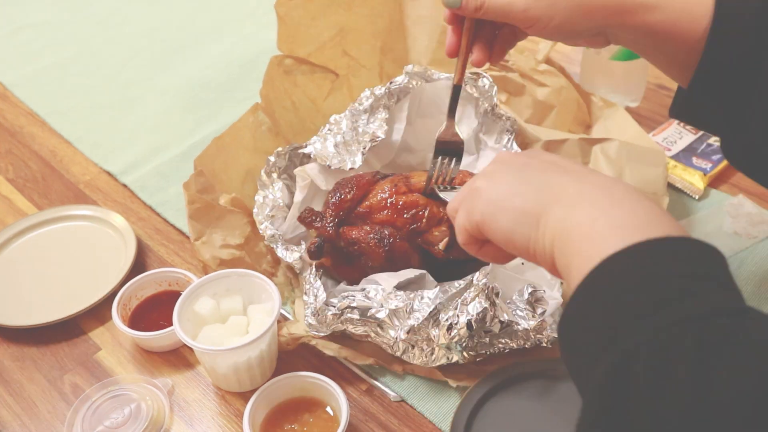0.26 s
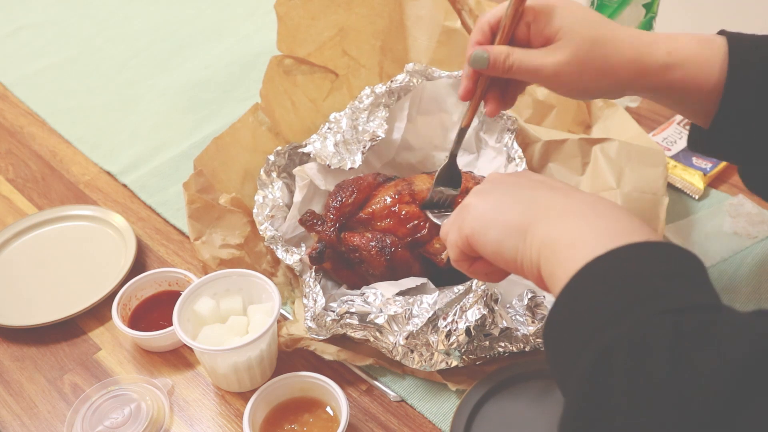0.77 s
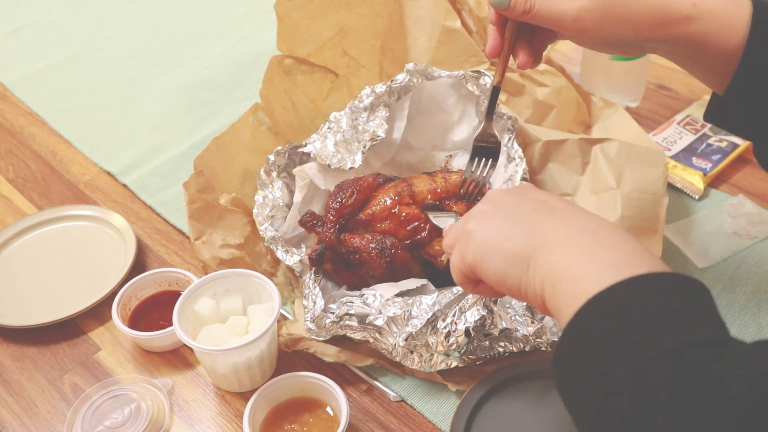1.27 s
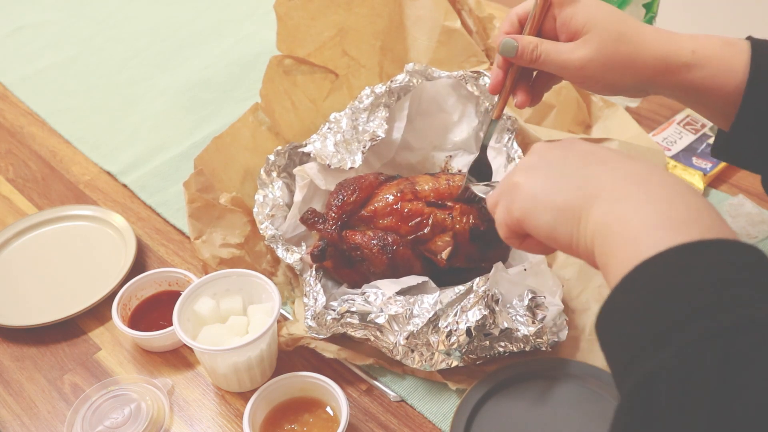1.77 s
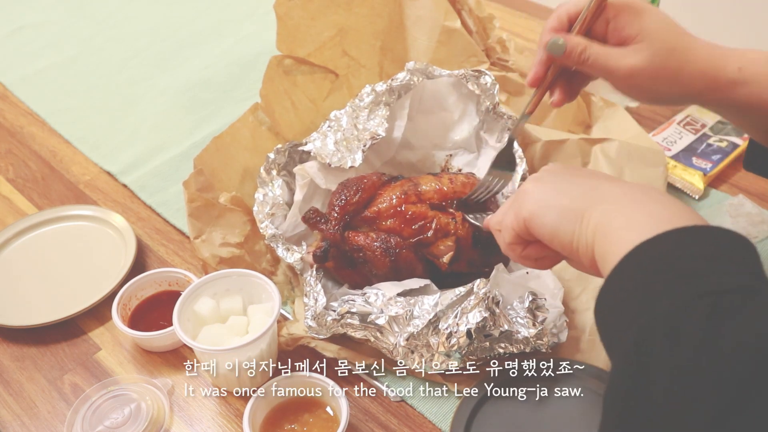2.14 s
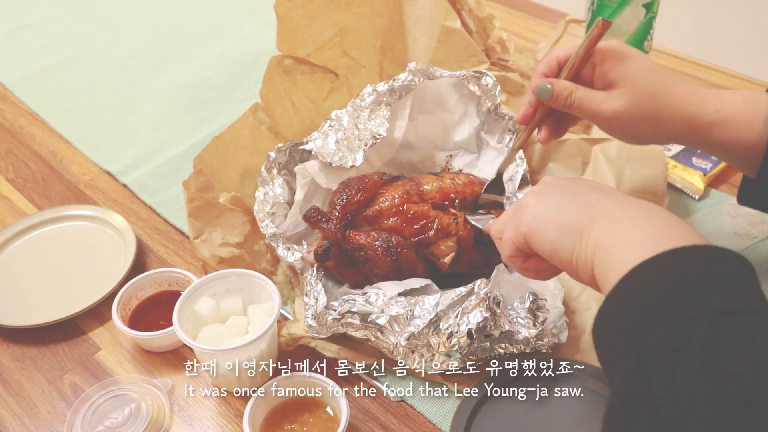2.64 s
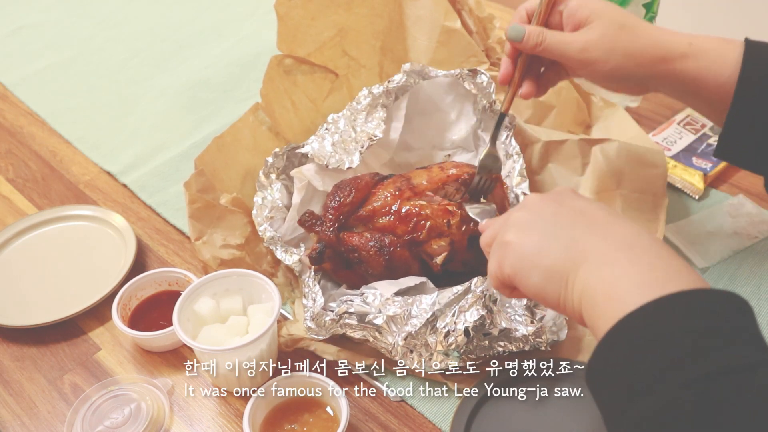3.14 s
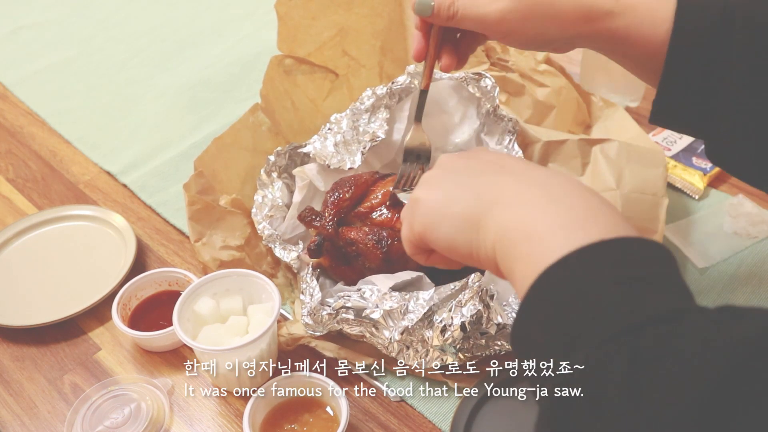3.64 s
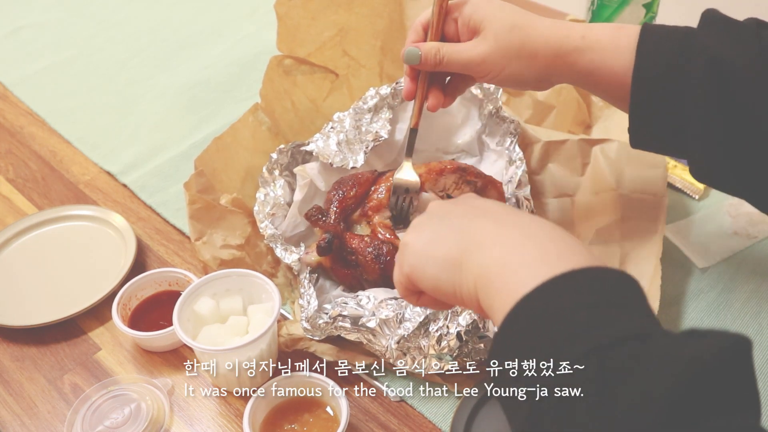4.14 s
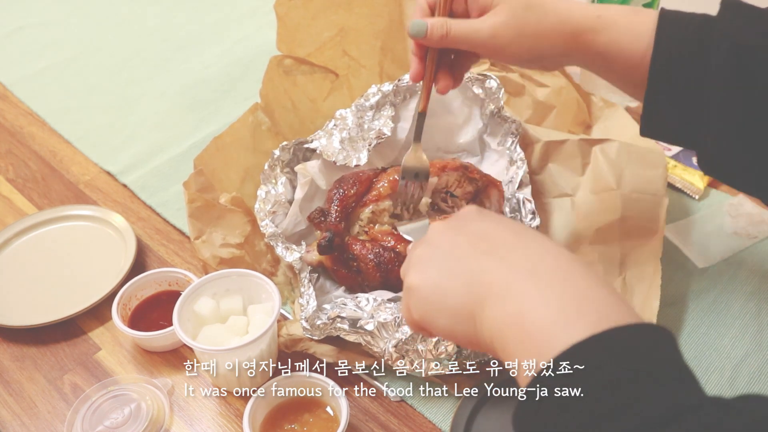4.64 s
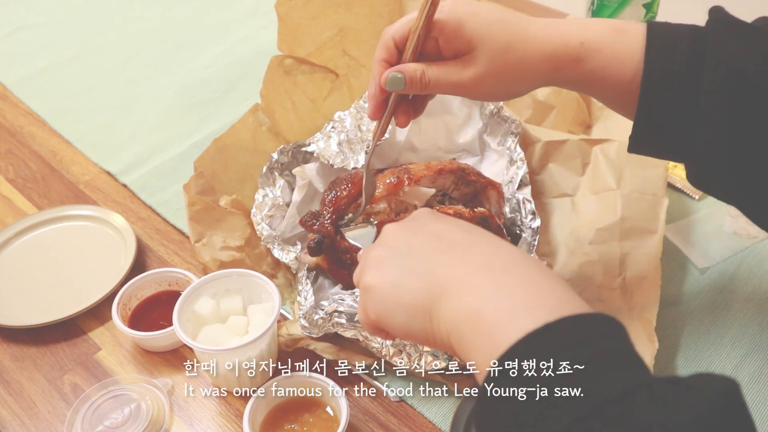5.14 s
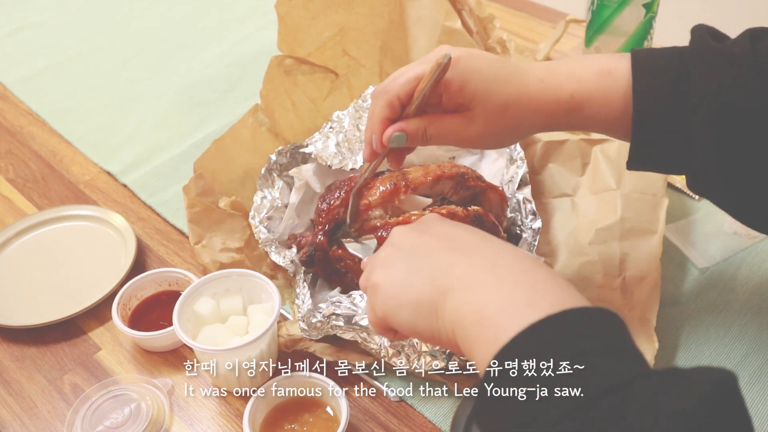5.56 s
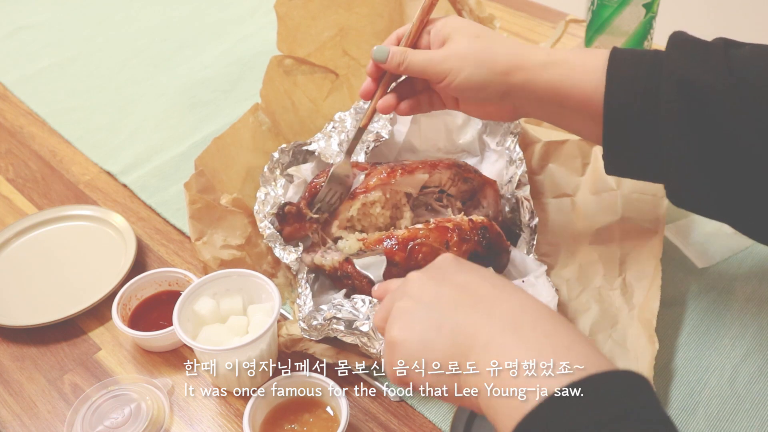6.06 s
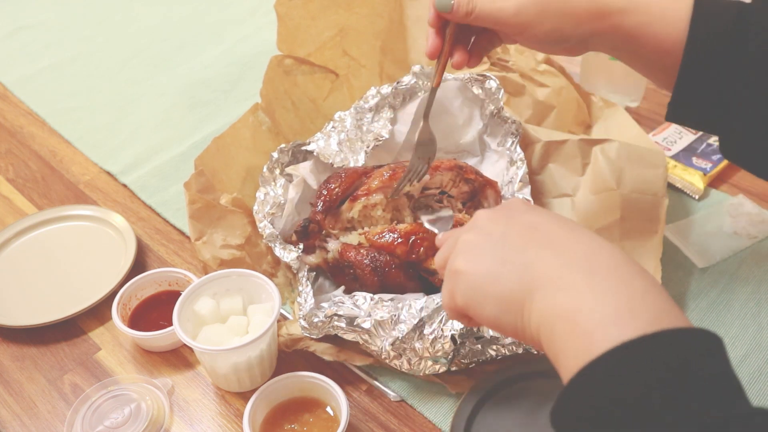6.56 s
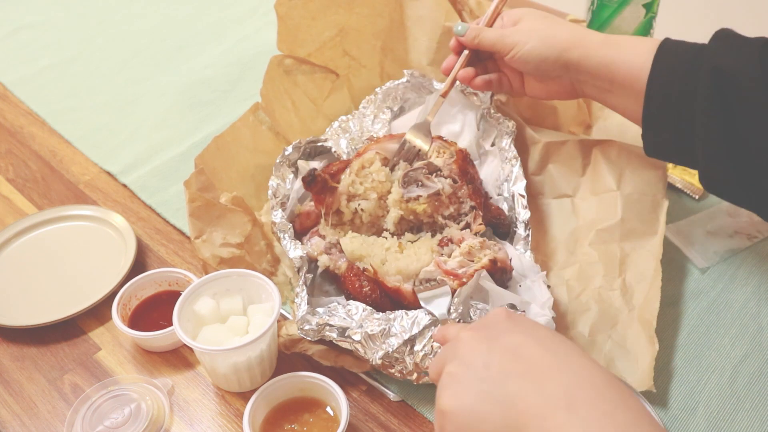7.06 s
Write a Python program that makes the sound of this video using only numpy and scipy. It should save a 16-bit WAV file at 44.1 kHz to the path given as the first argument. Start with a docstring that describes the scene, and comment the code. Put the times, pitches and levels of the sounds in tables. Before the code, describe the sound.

Close microphone in a small quiet room. Two forks tear a roast chicken in a nest of foil on paper. Sharp foil snaps over fine crackle come in irregular bursts, with faint fork clinks near one second, dull bumps and rumbles as the parcel shifts, tiny wet ticks of parting meat, brief scrapes, and a final dragging rustle of foil.

```python
"""In a small room, two forks pull a roast chicken apart in its nest of foil on wrapping paper, close by.
Creases snap one by one, each a short noise burst ringing its own facet, over a fine crackle of tiny clicks.
Soft slips make the pushed parcel rumble, and short dull bursts make it bump on the table.
Meat parts with tiny ticks, the nest drags, forks scrape, and fading sine tones let a fork ring faintly."""
import sys
import numpy as np
from scipy import signal
from scipy.fft import rfft, irfft
from scipy.io import wavfile
from scipy.ndimage import uniform_filter1d

SR = 44100
rng = np.random.default_rng(int(sys.argv[2]) if len(sys.argv) > 2 else 0)


def generate_wav(signal):
    """Clip the signal to [-1, 1] and save it as 16-bit WAV at the path in sys.argv[1]."""
    frames = np.transpose(np.atleast_2d(signal))
    scaled = np.clip(frames, -1, 1) * 32767
    pcm = np.round(scaled).astype(np.int16)
    wavfile.write(sys.argv[1], SR, pcm)


N = 322371
TIME = np.arange(N) / SR
CONTROL_TIME = np.arange(0, N / SR + .001, .001)  # slow controls are worked out every millisecond

# Colour of the quiet room air. Each row: frequency in Hz, level in dB.
AIR = [(25, -2.5), (180, 13), (400, 9), (780, 5), (1300, -17), (4000, -34), (5500, -13), (9000, -9.5),
       (15500, -18)]
AIR_DB = -50.5

# The forks lean on the bird and shift the parcel. Each row: start of full strength in seconds,
# rumble level in dB before its trim, swell in seconds, hold in seconds, deep rumble in dB against the rest.
PUSHES = [(.005, -39, .02, 0.0043, -7), (.12, -45, 0.053, .01, -13), (.64, -47, 0.43, 0.51, -1.5),
          (1.5, -35, 0.56, 0.24, -0.5), (2.01, -32, 0.54, 0.0041, 2), (2.55, -32.5, 0.59, 0.043, -0.5),
          (2.75, -28.5, .1, 0.013, 2), (2.86, -34.5, 0.14, 0.097, -3.5), (3.33, -41, 0.087, 0.022, -3),
          (3.94, -40.5, 0.082, 0.079, -4), (4.2, -36.5, 0.58, .17, -4), (4.71, -36, 0.37, 0.056, -2),
          (5, -37.5, 0.14, 0.04, 3), (5.43, -33, 1, 0.0072, -2.5), (5.7, -31, 0.25, 0.013, -6.5),
          (5.9, -37, 0.29, 0.02, -3), (6.15, -67, .05, 0.12, -3), (6.81, -37, 0.19, 0.082, -3),
          (7.17, -47, 0.29, 0.1, 2)]
REST_DB, USUAL_PUSH_DB = -59, -51  # parcel settling between pushes, and usual pressure; before the rumble's trim
# Colour of the rumble. Each row: frequency in Hz, level in dB.
RUMBLE_COLOUR = [(25, -18), (55, -3.5), (85, -2.5), (125, 1.5), (190, 0), (260, 1.5), (370, -2.5),
                 (600, -4.5), (1000, -9), (2000, -24)]
# The parcel bumps on the table. Each row: start in seconds, average level in dB before the bumps' trim,
# middle of its broad pitch in Hz, length in milliseconds.
BUMPS = [(1.377, -34, 248, 8.3), (1.51, -29.5, 353, 26), (2.002, -29, 198, 14), (2.469, -35, 300, 8),
         (2.751, -20, 340, 4.3), (2.804, -30, 200, 14), (2.882, -23, 486, 5.1), (2.938, -25, 485, 13),
         (2.985, -20, 264, 3.3), (4.205, -24.5, 198, 6.3), (4.25, -23.5, 450, 5.3), (5.662, -24, 517, 5.7),
         (5.698, -23, 536, 12.5), (6.146, -37, 344, 25), (7.17, -22.5, 620, 5.9)]

# A fork's tines are plucked. Each row: start in seconds, level in dB before the forks' trim, main pitch in Hz.
CLINKS = [(0.872, -30, 4700), (.917, -24.5, 4823), (1.051, -35, 4680), (1.21, -29, 4870),
          (5.006, -26, 5523), (5.018, -30, 7600)]
# Ways the tines ring. Each row: multiple of the main pitch, level in dB, time to fall by 60 dB in seconds.
TINES = [(.792, -38, .25), (0.999, -5, 0.26), (1.039, -19, .17), (1.1, -10, 0.29), (1.22, -24, .25),
         (1.53, -10, .2), (1.755, -20, 0.38), (2.05, -26, .2)]
# One fork rubs the other or bone. Each row: start of full strength in seconds, level in dB,
# swell in seconds, hold in seconds.
SCRAPES = [(3.755, -43.5, 0.043, 0.1), (3.95, -24.5, 0.046, .005), (5.21, -38, 0.028, .06)]
# Resonances of a tightly held fork. Each row: pitch in Hz, width setting in Hz, drive in dB.
FORK_BODY = [(2847, 120, 9), (3950, 240, -14), (4630, 850, 9), (5000, 430, -9)]

# Sticky skin and meat fibres part. Each row: start in seconds, average level in dB before the skin's trim.
SKIN_TICKS = [(0.533, -30), (0.5422, -25), (0.6998, -29), (0.8644, -21), (1.3508, -29), (1.4377, -20),
              (1.4641, -15), (1.7574, -21.5), (1.8614, -20), (2.2707, -19.5), (2.542, -16.5), (2.8644, -24),
              (4.1205, -20), (4.132, -11.5), (4.6764, -17), (5.275, -30), (5.8486, -29), (6.6094, -68.5)]
# Colour of the ticks. Each row: frequency in Hz, level in dB.
SKIN_COLOUR = [(1000, -40), (3000, 0), (6000, 5), (11000, 8), (16000, -12)]

# The foil nest drags over paper as the bird is pulled open. Each row: start of full strength in seconds,
# level in dB, swell in seconds, hold in seconds.
TUGS = [(6.69, -45, 0.023, 0.037), (6.755, -24, 0.045, 0.044), (6.865, -20, 0.043, 0.051),
        (7.005, -22, 0.07, 0.0061), (7.09, -26, 0.07, 0.0084)]
# Resonances of the stretched nest. Each row: pitch in Hz, width setting in Hz, drive in dB.
NEST_BODY = [(960, 240, -3.5), (4250, 480, -2), (4970, 200, -3.5), (5770, 720, -5.5), (6300, 240, -10),
             (9170, 340, -13), (10400, 450, -13)]

# Fork moves crumple a patch of wrapping. Each row: start of full strength in seconds,
# level in dB before the crackle's trim, swell in seconds, hold in seconds, brightness in dB.
CRUMPLES = [(.003, -21.5, 0.036, 0.0017, 6.5), (0.106, -26.5, 0.085, 0.026, 5), (.33, -49, 0.046, 0.036, 3),
            (.42, -44.5, .008, 0.034, -19), (0.574, -35.5, 0.082, 0.02, -9), (0.731, -36, 0.14, 0.029, 3),
            (0.897, -28.5, 0.029, 0.016, 1), (1.219, -32, 0.023, 0.0038, 4), (1.3, -33, 0.029, 0.0046, 5),
            (1.476, -26, 0.058, 0.036, 1), (1.614, -26, 0.22, 0.019, 1), (1.875, -28.5, 0.063, 0.035, 0),
            (1.955, -33, 0.032, .01, 2), (2.035, -18.5, 0.075, 0.015, 3.5), (2.17, -39.5, 0.096, 0.041, 2),
            (2.471, -31.5, 0.071, 0.004, 0), (2.563, -26, 0.08, 0.0034, -3), (2.754, -27, 0.11, 0.27, 2),
            (2.992, -19, 0.028, 0.0028, -4), (3.14, -23.5, 0.022, 0.0026, 3),
            (3.188, -32.5, 0.056, 0.021, 0), (3.343, -37, 0.43, 0.0073, 0), (3.522, -38, 0.028, 0.068, -5),
            (3.777, -41.5, 0.13, 0.057, 2), (3.936, -24.5, 0.095, .005, 6), (4.21, -26.5, 0.15, 0.047, -1),
            (4.294, -18, 0.074, 0.041, -2), (4.386, -14.5, 0.069, 0.004, 2), (4.505, -30.5, 0.07, .005, 4),
            (4.645, -25, 0.041, 0.015, 1), (4.735, -22.5, 0.17, 0.011, -6),
            (4.881, -29.5, 0.0063, 0.0016, 11), (5.009, -31, 0.21, .005, 5),
            (5.151, -24.5, 0.019, 0.0034, 3), (5.24, -35, 0.071, .04, 5), (5.365, -26.5, 0.14, 0.0097, -1),
            (5.445, -35, .06, 0.033, 3), (5.69, -21, 0.12, 0.009, 3.5), (5.809, -28, 0.04, 0.0025, -8),
            (5.912, -17.5, 0.037, 0.0072, -2), (5.967, -18.5, 0.058, 0.0037, -1),
            (6.062, -31.5, .02, 0.0068, -1), (6.153, -28.5, .045, 0.044, -8),
            (6.218, -30, 0.17, 0.093, 6.5), (6.365, -34, 0.044, .01, 7), (6.755, -20.5, 0.071, 0.034, 4),
            (6.868, -19, 0.086, 0.05, 8), (6.959, -21.5, 0.033, .13, 3.5), (7.169, -24, 0.17, .025, 2),
            (7.305, -26.5, 0.024, .005, -4)]
FADE_S, FADE_SHARE = 0.022, 0.42  # a move fades by 20 dB in this time plus this share of its swell
# Colour of the crackle. Each row: frequency in Hz, level in dB per Hz.
CRACKLE_COLOUR = [(350, -10), (550, 3), (760, -2.5), (1000, 6.5), (1400, 5.5), (2000, 3.5), (2800, 2),
                  (3600, -2.5), (5000, 1.5), (6200, -3.5), (8400, -15.5), (10200, -10), (13000, -26.5),
                  (15500, -58)]
SCATTER_S = .0015  # how long a click scatters across the sheet

# The loudest creases snap. Each row: start in seconds, average level in dB, length in milliseconds,
# facet pitch in Hz, height of the facet's ring in dB, brightness in dB.
SNAPS = [(0.0616, -25, 4.7, 3500, 11, 14), (0.1006, -15, 2.2, 2190, 14, 18),
         (0.1112, -17.5, 6, 1210, 8, 10), (0.1256, -20.5, 5.8, 1880, 8, -6),
         (0.3635, -41, 2.7, 2500, 13, -4), (0.417, -21, 1.5, 2780, 9.5, 5),
         (0.663, -31.5, 4.2, 5500, -6, 7), (.768, -23, 5, 1400, -16, 5), (.872, -21.5, 4.2, 1700, -4, 1),
         (0.8969, -18.5, 3.7, 1350, -1, 16), (0.9156, -15.5, 5.2, 4800, 10, 12),
         (1.0027, -24, 3.7, 1140, 3, 7), (1.052, -25.5, 3.3, 4780, 4, 10), (1.2104, -19.5, 2.8, 5100, 6, 7),
         (1.2242, -27, 3.7, 6600, 14, -6), (1.2954, -10.5, 0.69, 2750, 5, -30),
         (1.437, -25.5, 9.4, 5480, 4, 4), (1.5084, -15.5, 5.1, 4340, 1, 12),
         (1.558, -13.5, 3.8, 7500, 14, 4), (1.58, -20, 5.1, 4760, 13, 16), (1.5879, -17.5, 4.1, 4530, 7, 4),
         (1.648, -16, 5.9, 2430, 11, 7), (1.8017, -30, 5.9, 4500, 1, -2),
         (1.851, -12.5, 1.55, 3830, 25, 33.5), (2.0042, -21, 3.3, 2940, 5, -2),
         (2.0218, -14, 3.9, 2100, 9, 10), (2.0363, -15, 4, 4330, 14, 8), (2.0523, -9, 1.9, 6570, 8, 13),
         (2.068, -9.5, 1.7, 1850, -5, 9), (2.082, -9, 2.04, 2040, 18.5, -26),
         (2.2868, -29.5, 9.5, 4600, 6, -6), (2.457, -24, 1.8, 5370, 26, 34),
         (2.5872, -27.5, 6.1, 4290, 3, 12), (2.668, -26, 4.9, 1140, 14, 13),
         (2.7511, -13.5, 5.3, 4200, 6, 16), (2.8517, -12, 1.5, 5450, 19, 17),
         (2.883, -17.5, 2.2, 6990, -9, -14), (2.911, -13, 1.5, 4060, 15, 21),
         (2.922, -7.5, 1, 4480, 16, 17), (2.944, -10, 2.2, 4530, 8, 8), (2.9488, -11.5, 1.2, 1430, 20, 29),
         (2.9536, -16.5, 3.9, 5820, 10, -6), (2.9843, -8.5, 3.7, 1720, 12, 9),
         (2.9964, -6.5, 3.6, 1920, 9.5, 16.5), (3.1344, -19, 8.8, 2550, 13, 6),
         (3.1616, -23.5, 7.8, 2320, 10, 10), (3.3341, -25.5, 8.2, 2420, 13, -29),
         (3.3466, -27.5, 12.5, 2700, 20, 13), (3.889, -25.5, 4.4, 4850, 11, 12),
         (3.928, -21, 2.2, 3000, 4, 6), (3.9359, -15.5, 7.9, 1100, 12.5, 15.5),
         (4.1017, -20, 3.1, 6100, 8, 31), (4.179, -25, 3.3, 5500, 0, 11),
         (4.2055, -22.5, 3.4, 6460, 11, 17), (4.2504, -17.5, 4, 1840, 15, 6), (4.261, -16.5, 3, 4560, 1, 3),
         (4.3006, -19.5, 8, 1060, 10, 14), (4.322, -17, 4, 2880, 9, 2), (4.357, -21, 3.6, 3000, 8, 12),
         (4.384, -14.5, 7.2, 2740, 16, -12), (4.4094, -12.5, 3.2, 2330, 14, 7),
         (4.414, -15.5, 3.5, 9100, 20, -5), (4.441, -17, 4.4, 5820, 2, 9),
         (4.471, -24.5, 7.2, 5500, -9, -2), (4.5057, -14.5, 2.4, 2840, 11, 18),
         (4.6577, -27, 5.6, 3980, 25, 22), (4.892, -24.5, 3.8, 3200, 6, -10),
         (4.9762, -21.5, 7.8, 7540, 9, 9), (5.007, -16, 5.2, 6860, 7, 20), (5.0191, -12, 2.5, 7560, 10, 21),
         (5.15, -20, 10.4, 2830, 9.5, -7), (5.3496, -19, 3.7, 2700, 10, -17),
         (5.367, -21, 2.1, 3170, 7, 19), (5.449, -22, 4.3, 8390, 6, -2),
         (5.4667, -10.5, 3.8, 1170, 5, 14.5), (5.4739, -10, 0.95, 3350, 24, 9),
         (5.484, -8.5, 1.6, 3070, 12, 11), (5.6595, -14, 2.2, 4230, 7, 16),
         (5.6649, -10, 6.2, 1800, 13, 18), (5.6998, -16, 7.5, 7450, 5, 5),
         (5.714, -13.5, 4.1, 930, 13.5, 12), (5.803, -28, 5.5, 2720, 18, -19),
         (5.871, -22, 3.9, 3040, 19, 17), (5.933, -26, 6.8, 3200, 8, -2), (5.9584, -18, 2.4, 2640, 15, -8),
         (5.9693, -8, 4.7, 1100, -18, 11), (5.9875, -13, 1.3, 2460, 7, 4),
         (6.005, -13.5, 2.1, 3130, 10, -22), (6.1603, -22.5, 3.6, 5480, 6, 8),
         (6.2255, -7, 1.7, 5300, 3.5, 15), (6.3704, -22, 3, 2480, 7, 0), (6.7405, -16.5, 1.5, 6200, 28, -3),
         (6.756, -13, 1.3, 2230, 7, -2), (6.777, -24, 4, 5820, 4, 0), (6.8254, -15.5, 4.8, 5480, 9, 10),
         (6.857, -18, 5.6, 1000, 23, 4), (6.9311, -12.5, 2.4, 1070, 16, 6), (6.9413, -9, 1.2, 940, 3, 13),
         (6.968, -14, 2.6, 1350, 14, -10), (6.984, -10.5, 0.86, 1130, 23, 20),
         (7.05, -17.5, 4.4, 3900, 8, 11), (7.0858, -15.5, 1.4, 870, 9, 14), (7.0996, -19, 5.3, 1210, 10, 7),
         (7.175, -16.5, 6.4, 1800, 9, 6)]
# Colour of the sheet under a snap. Each row: frequency in Hz, level in dB.
SNAP_COLOUR = [(100, -12.5), (400, -3.5), (740, -11.5), (1000, 0), (1800, -0.5), (3400, 0), (5600, -1),
               (8400, -15.5), (10500, -16), (13000, -24), (16000, -38)]
SNAP_LOWS_DB, LOWS_PER_PUSH = -6, 0.28  # lows at usual pressure, and dB more per dB of pressure
SNAP_FALL, SNAP_RISE_SHARE = 0.9, .06

TOP_HZ = 15900  # nearly nothing is heard above this


def undb(db):
    """Turn decibels into a gain."""
    return np.exp(np.asarray(db) * (np.log(10) / 20))


def unit(x):
    """Scale to an average (rms) level of 1."""
    return x / np.sqrt(np.mean(x ** 2) + 1e-18)


def even(x, span_s):
    """Hold the slow level near 1 and keep the fine grain."""
    size = max(int(span_s * SR), 8)
    power = uniform_filter1d(uniform_filter1d(x ** 2, size), size)
    return x / np.sqrt(power + 1e-9)


def slope(points, hz):
    """Read a curve of (Hz, dB) points, with pitch spaced as the ear hears it."""
    f, db = np.transpose(points)
    return np.interp(np.log(hz), np.log(f), db)


def bins(size):
    """List the frequencies of a spectrum, kept above zero."""
    return np.maximum(np.fft.rfftfreq(size, 1 / SR), 1)


def response(db):
    """Turn a gain curve into a ring that starts at once, by folding its cepstrum."""
    cep = irfft(db * np.log(10) / 20)
    half = len(cep) // 2
    cep[1:half] *= 2
    cep[half + 1:] = 0
    return irfft(np.exp(rfft(cep)))


def tint(x, points):
    """Colour a long sound with a curve of (Hz, dB) points."""
    gain = undb(slope(points, bins(len(x))))
    return irfft(rfft(x) * gain, len(x))


def hump(hz, centre_hz, octaves):
    """Outline a resonance, 1 at its centre."""
    return 1 / (1 + (np.log2(hz / centre_hz) / octaves) ** 2)


def burst(length_ms, fall, rise_share, size):
    """Spectrum of a noise burst that builds fast and dies away, with its broad colour evened out."""
    age = np.arange(size) / SR * 1000 / length_ms
    shape = (1 - np.exp(-age / rise_share)) * np.exp(-fall * age ** 2)
    spec = rfft(rng.standard_normal(size) * shape)
    power = uniform_filter1d(np.abs(spec) ** 2, max(int(size / 24 / length_ms), 3))
    return spec / np.sqrt(np.abs(power) + 1e-12)


def blow(db_curve, db, length_ms, fall, rise_share):
    """A burst makes a body ring; its energy is set by its average level over its length."""
    body = response(db_curve)
    y = irfft(burst(length_ms, fall, rise_share, len(body)) * rfft(body))
    return y * undb(db) * np.sqrt(length_ms * SR / 1000 / np.sum(y ** 2))


def add(out, s, sound):
    """Mix a sound in at a time in seconds."""
    start = int(np.clip(s * SR, 0, N - 1))
    out[start:start + len(sound)] += sound[:N - start]


def grains(rate, spread_db):
    """Random clicks, about `rate` a second; with a spread, many are small and a few large."""
    size = undb(spread_db * np.minimum(rng.exponential(size=N), 4.5))
    return (rng.random(N) < rate / SR) * size


def wander(rate):
    """A wandering line through random points, `rate` of them a second."""
    points = rng.standard_normal(4096)
    return 1.35 * np.interp(TIME * rate, np.arange(len(points)), points)


def held(control):
    """Stretch a slow control to one value a sample."""
    return np.interp(TIME, CONTROL_TIME, control)


def stroke(s, db, swell_s, hold_s):
    """Gain of one hand move: it swells by 20 dB, holds, and fades; slow moves fade slowly."""
    swell_s = max(swell_s, .005)
    before = np.maximum(s - CONTROL_TIME, 0) / swell_s
    after = np.maximum(CONTROL_TIME - s - hold_s, 0) / (FADE_S + FADE_SHARE * swell_s)
    return undb(db - 20 * np.minimum(before + after, 10))


def together(moves, rest_db):
    """Joint gain of moves over a resting level, and the colour of whichever prevails."""
    power, colour = undb(rest_db) ** 2, 0
    for s, db, swell_s, hold_s, colour_db in moves:
        own = stroke(s, db, swell_s, hold_s) ** 2
        power = power + own
        colour = colour + own * colour_db
    return held(np.sqrt(power)), held(colour / power)


def friction(moves, body, rate, spread_db, shift_db=4.0, shift_rate=45):
    """Uneven stick-slip pulses ring a body's resonances, now one and now another as the contact moves."""
    slips = grains(rate, spread_db) * rng.standard_normal(N)
    out = 0
    for hz, width_hz, db in body:
        peak = signal.iirpeak(hz, hz / width_hz / 0.57, fs=SR)
        drive = slips * undb(db + shift_db * wander(shift_rate))
        once = signal.lfilter(*peak, drive)
        out = out + signal.lfilter(*peak, once)
    return even(out, span_s=0.081) * held(sum(stroke(*move) for move in moves))


def quiet_air():
    """Steady coloured noise stands for the room's quiet air."""
    return undb(AIR_DB) * unit(tint(rng.standard_normal(N), AIR))


def room(x, wet_db=-12, t60_low=0.32, t60_high=0.35, table_db=-14, table_s=0.0013):
    """Quick reflections come off table and dishes, then the short tail of a small room (t60 in seconds)."""
    age = TIME[:SR // 2]
    noise = rng.standard_normal((3, len(age)))
    low_pass = signal.butter(4, 6500, fs=SR, output="sos")
    high_pass = signal.butter(4, 6500, "high", fs=SR, output="sos")
    low = signal.sosfilt(low_pass, noise[0]) * undb(-60 * age / t60_low)
    high = signal.sosfilt(high_pass, noise[1]) * undb(-60 * age / t60_high)
    tail = (low + high) * np.clip(age / 0.0039, 0, 1)
    near = noise[2] * np.exp(-age / table_s) * (age > .0015)
    echo = (undb(wet_db) * unit(tail) + undb(table_db) * unit(near)) / np.sqrt(len(age))
    return signal.oaconvolve(x, echo)[:N]


def parcel(push, deep_db, crumple, rumble_db=-1, shaken_db=-20, bump_db=-1):
    """Meat and paper drag in dull slips; pressure reaches the table, crumples only shake; shoves bump."""
    slips = grains(rate=1200, spread_db=0) * rng.standard_normal(N)
    rumble = even(tint(slips, RUMBLE_COLOUR), span_s=0.011)
    deep = tint(rumble, [(120, 0), (170, -8), (260, -40)])
    pressed = push * undb(rumble_db)
    shaken = crumple * undb(shaken_db)
    out = (rumble - deep) * np.hypot(pressed, shaken) + deep * pressed * undb(deep_db)
    hz = bins(size=8192)
    for s, db, pitch_hz, ms in BUMPS:
        body = 48 * hump(hz, pitch_hz, octaves=1.8)
        add(out, s, blow(body, db + bump_db, ms, fall=0.75, rise_share=0.18))
    return out


def fork_rings(gain_db=-4, split=0.031):
    """Steel tines ring briefly, damped by hand and meat; the four tines differ a little and beat."""
    out, age = np.zeros(N), TIME[:SR // 2]
    for s, db, hz in CLINKS:
        for ratio, mode_db, t60 in TINES:
            tines_hz = hz * ratio * (1 + split * rng.standard_normal((4, 1)))
            cycles = tines_hz * age + rng.random((4, 1))
            ring = unit(np.sin(2 * np.pi * cycles).sum(axis=0))
            add(out, s, ring * undb(db + gain_db + mode_db - 60 * age / t60))
    return out


def fork_scrapes():
    """A fork sticks and slips against the other or on bone, and its held steel rings."""
    return friction(SCRAPES, FORK_BODY, rate=610, spread_db=10.0)


def skin(gain_db=-9, length_ms=1.0):
    """Wet strands let go, each with one very short bright tick."""
    out, colour = np.zeros(N), slope(SKIN_COLOUR, bins(size=1024))
    for s, db in SKIN_TICKS:
        add(out, s, blow(colour, db + gain_db, length_ms, fall=0.52, rise_share=0.11))
    return out


def nest_tugs():
    """The foil nest sticks and slips over the paper in tugs, and its stretched sheet rings."""
    return friction(TUGS, NEST_BODY, rate=1500, spread_db=5.0)


def handling(crumple, push, pressed_db=-6.5, paper_db=-3.0, paper_per_db=-0.0943):
    """Pressure alone keeps the crackle ticking; louder crackle holds less dull paper."""
    level_db = 20 * np.log10(np.hypot(crumple, push * undb(pressed_db)))
    return level_db, paper_db + paper_per_db * (level_db - level_db.mean())


def crackle(level_db, paper_db, foil_db, gain_db=-1.5, rate=900, scatter=1.0, facet_q=6.2,
            shift_db=3.0, shift_rate=110, clump_db=2.1, clump_rate=260):
    """Countless small creases each ring a chance mix of facets that changes as the sheet deforms."""
    # the strength of the clicks wanders quickly, so stronger and weaker clusters follow each other
    creases = grains(rate, spread_db=0) * undb(clump_db * wander(clump_rate))
    at, keep = np.flatnonzero(creases), np.exp(-1 / (SCATTER_S * SR))
    out, power = 0, 0
    for hz in np.geomspace(380, 15000, 26):
        hits = np.zeros(N)
        facet_gain = undb(shift_db * wander(shift_rate)[at])
        hits[at] = creases[at] * rng.standard_normal(len(at)) * facet_gain
        # each click scatters across the sheet in its own way, then the facet rings with it
        energy = signal.lfilter([1 - keep], [1, -keep], hits ** 2 + 1e-18)
        hits = hits + scatter * np.sqrt(energy) * rng.standard_normal(N)
        ring = signal.lfilter(*signal.iirpeak(hz, facet_q, fs=SR), hits)
        ring = signal.lfilter(*signal.iirpeak(hz, 2, fs=SR), ring)
        dull = slope([(1300, 1), (3200, 0)], hz)
        bright = slope([(5000, 0), (9000, 1)], hz)
        gain = undb(slope(CRACKLE_COLOUR, hz) + dull * paper_db + bright * foil_db) * np.sqrt(hz)
        out = out + gain * unit(ring)
        power = power + gain ** 2
    return even(out / np.sqrt(power), span_s=0.018) * undb(level_db + gain_db)


def snaps(push, ring_octaves=0.25, around=0.65):
    """Creases buckle and ring their facets, fuller under pressure; gives the sound ahead and all around."""
    ahead, spread, hz = np.zeros(N), np.zeros(N), bins(size=2048)
    lows = slope([(1100, 1), (3500, 0)], hz)
    highs = slope([(4500, 0), (10000, 1)], hz)
    sheet = slope(SNAP_COLOUR, hz)
    for s, db, ms, facet_hz, facet_db, bright_db in SNAPS:
        push_db = 20 * np.log10(push[int(s * SR)])
        low_db = SNAP_LOWS_DB + LOWS_PER_PUSH * (push_db - USUAL_PUSH_DB)
        facet = low_db * lows + bright_db * highs + facet_db * hump(hz, facet_hz, ring_octaves)
        add(ahead, s, blow(sheet + facet, db, ms, SNAP_FALL, SNAP_RISE_SHARE))
        # a facet beams its colour one way: averaged over all directions the sheet sounds plainer
        add(spread, s, blow(sheet + around * facet, db, ms, SNAP_FALL, SNAP_RISE_SHARE))
    return ahead, spread


def scene():
    """Wrapping, meat and forks sound in the room, over its quiet air."""
    push, deep_db = together(PUSHES, REST_DB)
    crumple, foil_db = together(CRUMPLES, rest_db=-50)
    level_db, paper_db = handling(crumple, push)
    cutlery = fork_rings() + fork_scrapes()
    wrapping = nest_tugs() + crackle(level_db, paper_db, foil_db)
    meal = parcel(push, deep_db, crumple) + cutlery + skin() + wrapping
    snaps_ahead, snaps_around = snaps(push)
    return (quiet_air() + room(snaps_around + meal) + meal + snaps_ahead)[None]


def record(dry):
    """Peaks beyond full scale are clipped flat, then a steep filter cuts the top."""
    top_cut = signal.ellip(10, .2, 90, TOP_HZ, fs=SR, output="sos")
    return signal.sosfilt(top_cut, np.clip(dry, -1, 1))


dry = scene()
out = record(dry)
generate_wav(out)
```